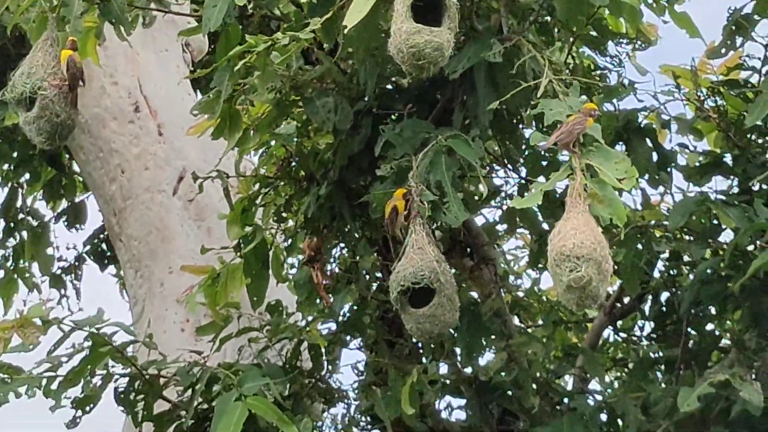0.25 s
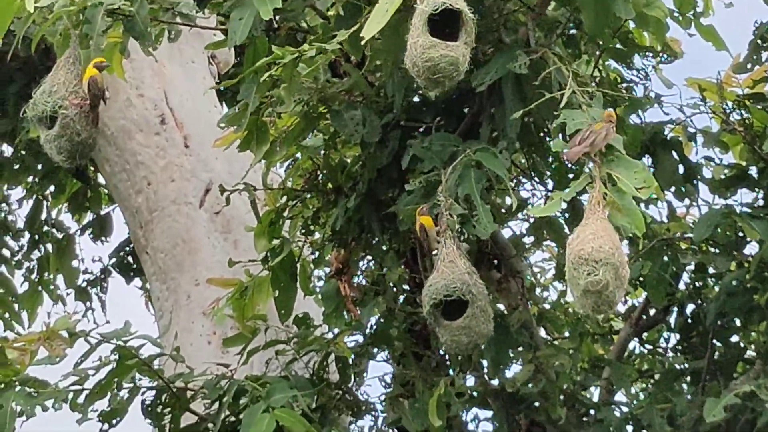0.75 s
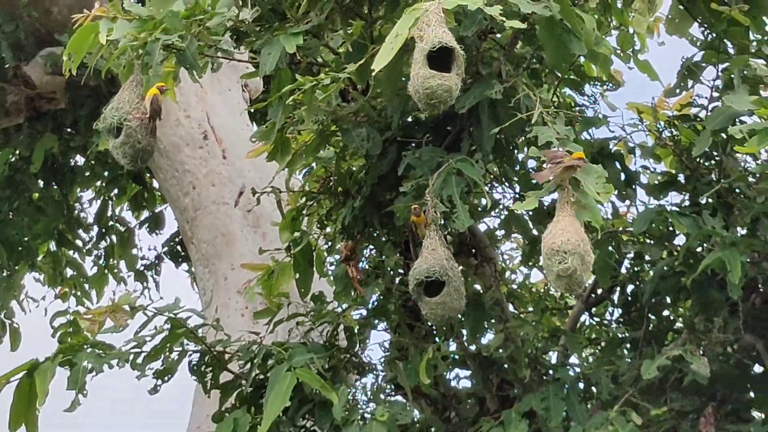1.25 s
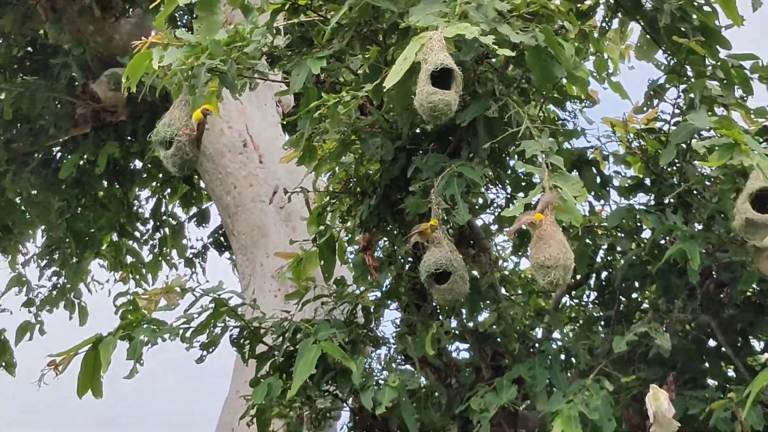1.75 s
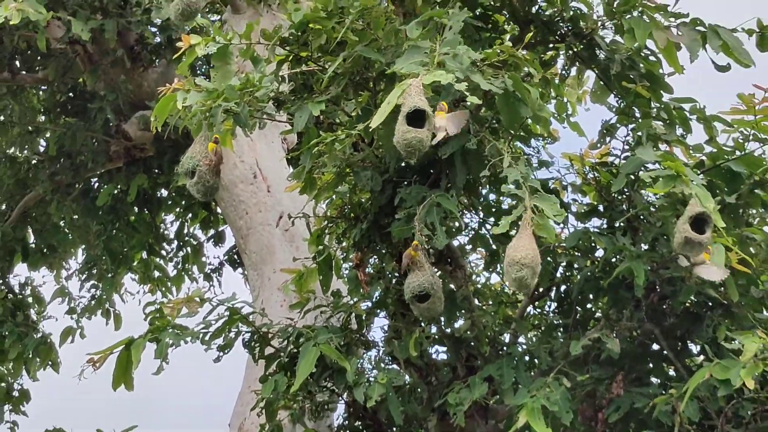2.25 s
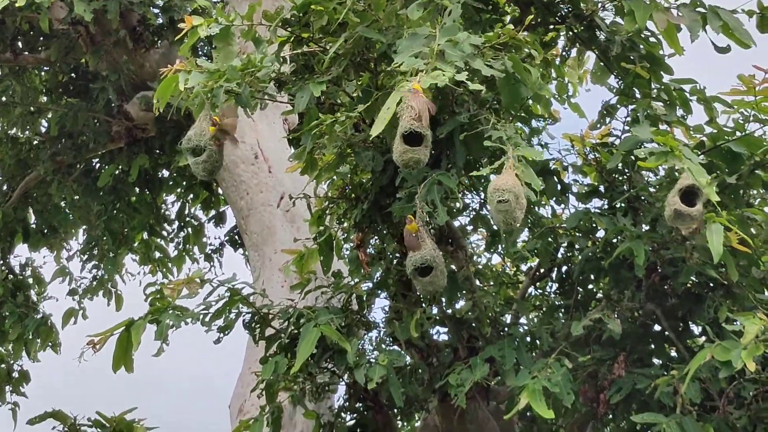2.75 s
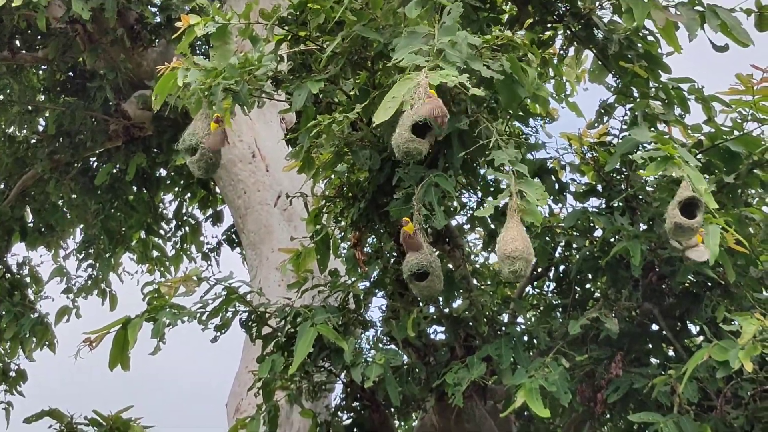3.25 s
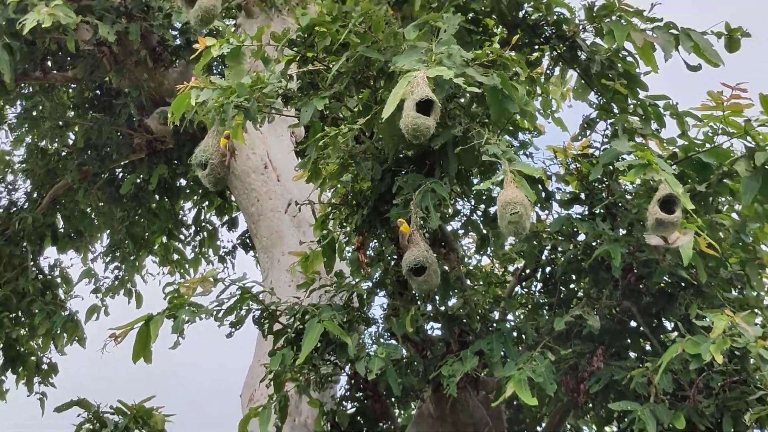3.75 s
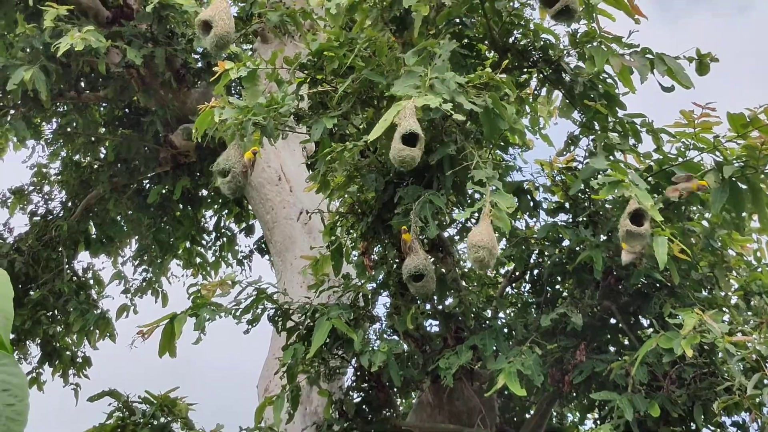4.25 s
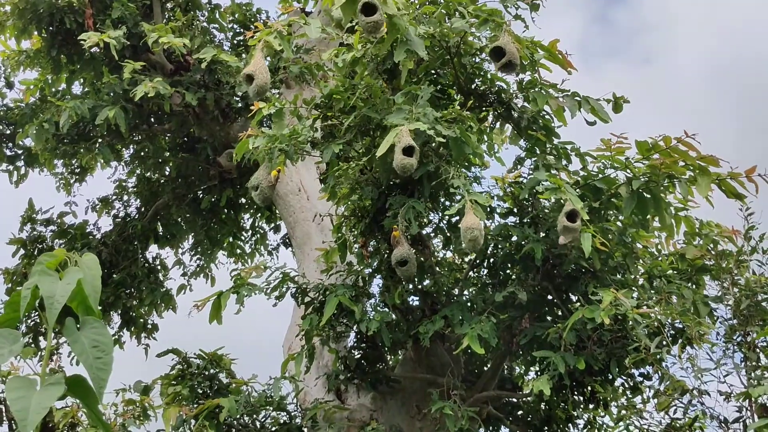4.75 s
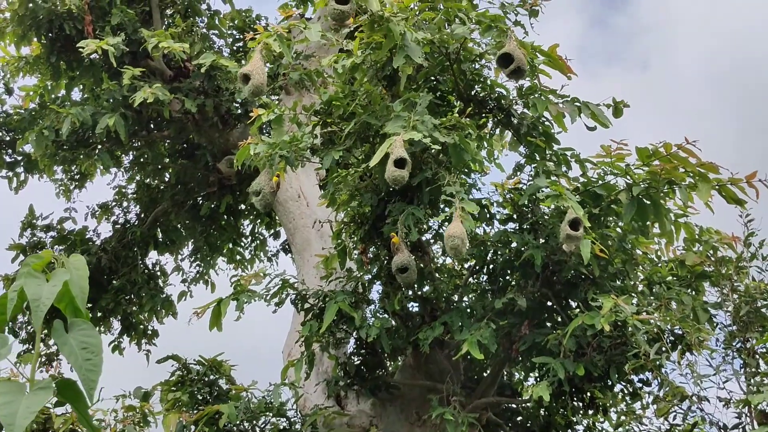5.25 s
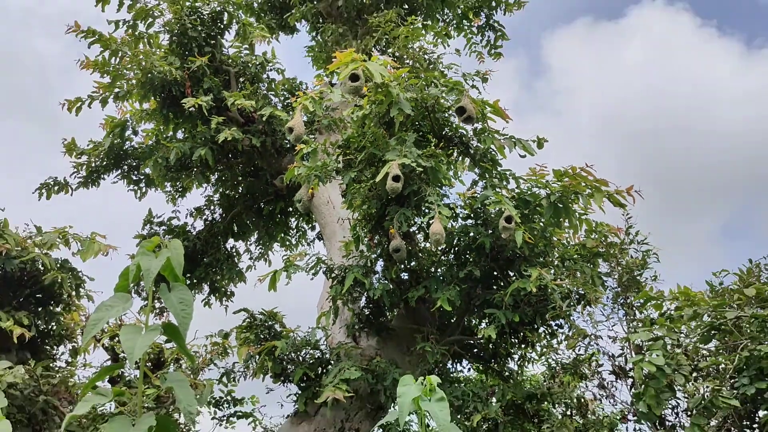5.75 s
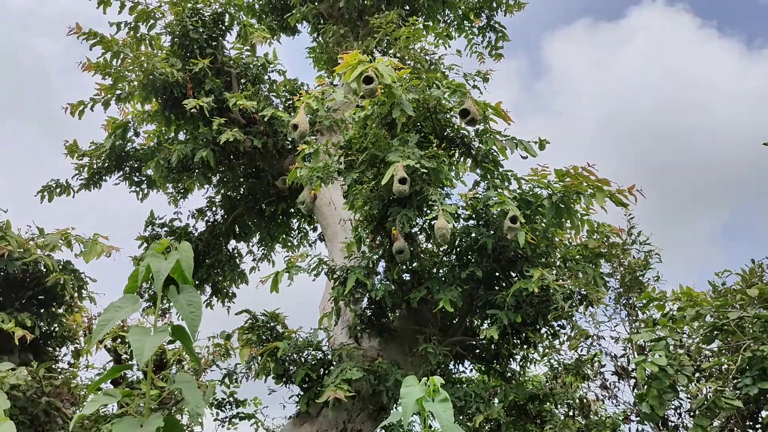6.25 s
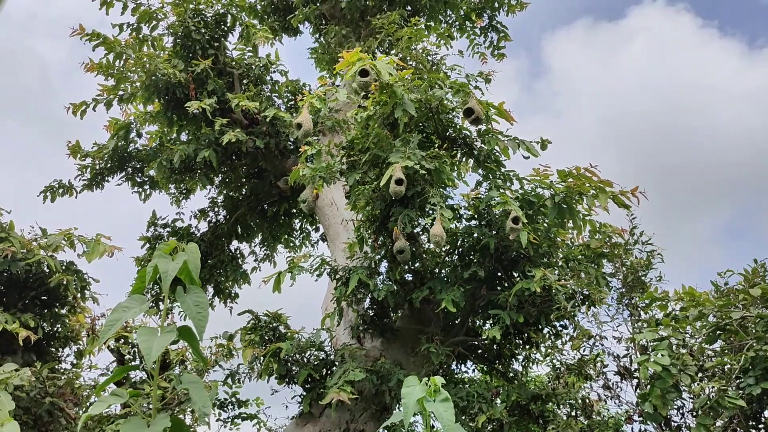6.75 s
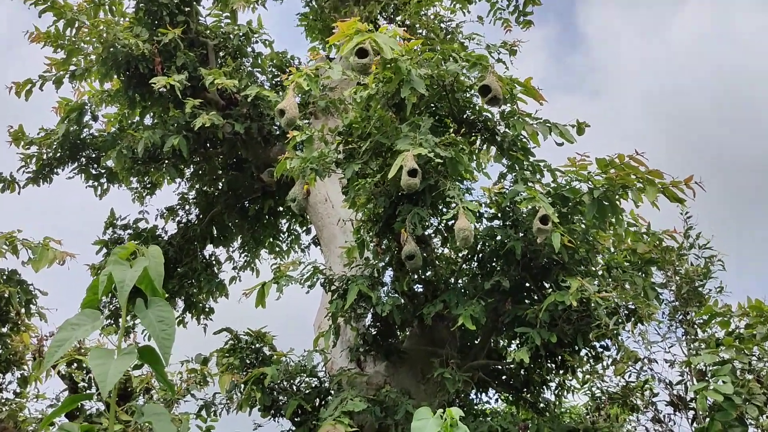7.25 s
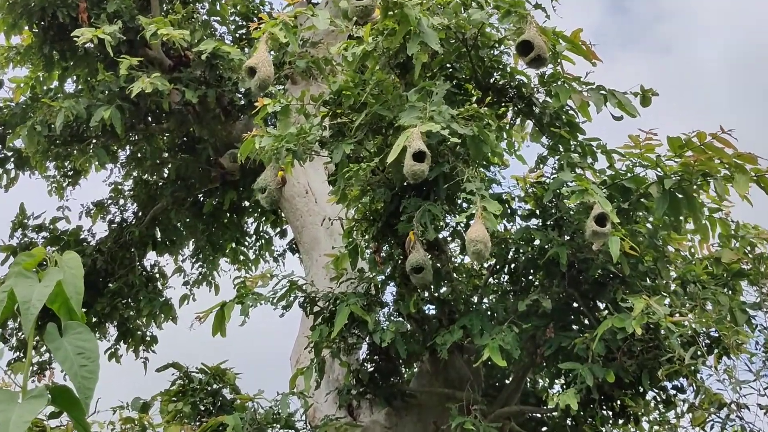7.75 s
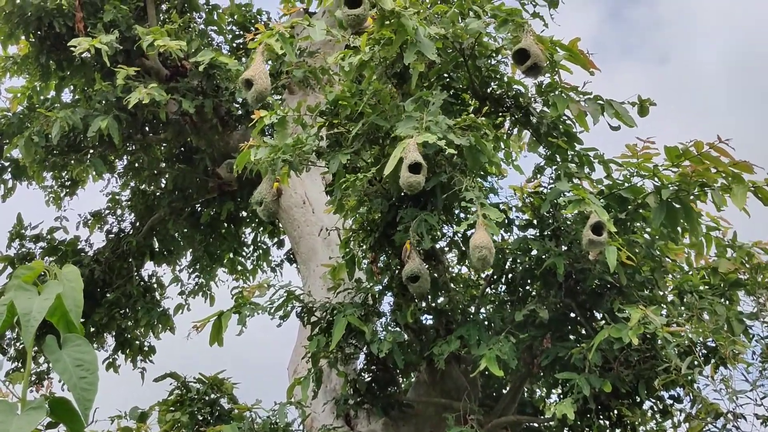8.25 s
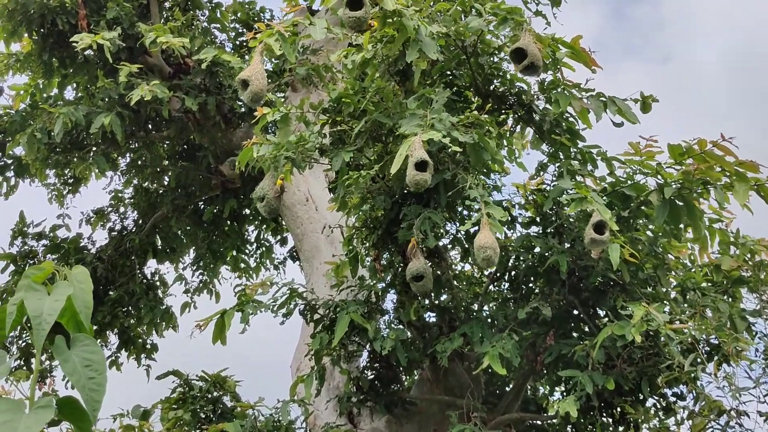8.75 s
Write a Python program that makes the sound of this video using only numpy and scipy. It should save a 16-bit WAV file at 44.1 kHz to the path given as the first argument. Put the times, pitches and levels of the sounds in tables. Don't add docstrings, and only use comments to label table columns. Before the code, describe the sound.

A colony of weaver birds chirps, whistles and chatters in a leafy tree, loudest in the first few seconds, with sharp double chirps continuing.

```python
import sys
import numpy as np
from scipy import signal
from scipy.fft import rfft, irfft, next_fast_len
from scipy.io import wavfile
from scipy.ndimage import uniform_filter1d

SR = 44100
rng = np.random.default_rng(int(sys.argv[2]) if len(sys.argv) > 2 else 0)


def ratio_of_db(decibels):
    return 10 ** (np.asarray(decibels, float) / 20)


def put_to_file(sound):
    columns = np.atleast_2d(sound).T
    safe = np.clip(columns, -1, 1)
    whole_steps = np.round(safe * 32767)
    wavfile.write(sys.argv[1], SR, whole_steps.astype(np.int16))


N = 397341

# (time [s], peak level [dB], top pitch [Hz],
# second stroke re first [dB], second stroke delay [s])
CHIRPS = [(0.0584, -39.5, 5996, 4, 0.033), (0.2065, -35.5, 6110, 1.5, 0.032), (0.484, -38, 6105, 0, 0.032),
          (0.7338, -44, 5960, 3.5, 0.035), (0.9097, -42, 6130, 2, 0.038), (1.097, -42.5, 6150, 3.5, 0.036),
          (1.231, -37, 6490, -5, 0.036), (3.417, -34.5, 6000, 0.5, 0.039), (3.618, -32.5, 6000, 0.5, .039),
          (4.006, -33, 5880, -1.5, 0.033), (5.2664, -41.5, 5870, -0.5, 0.034),
          (5.653, -36.5, 5940, -3, 0.031), (5.9525, -36.5, 5926, -1, 0.035),
          (6.2347, -34.5, 5980, -5, 0.037), (6.5382, -37, 5980, -1, 0.034), (6.7091, -35, 6020, -3, 0.035),
          (6.89, -35.5, 5940, -4, 0.036), (7.0986, -35, 6040, -1, 0.038), (7.3853, -36, 6020, -0.5, 0.036),
          (7.6712, -37, 5970, -1, 0.036), (7.9907, -35.5, 6040, 1, 0.033), (8.2457, -36, 5990, -0.5, 0.034),
          (8.459, -34.5, 6000, -3, 0.034), (8.6667, -34.5, 5965, -2, 0.037),
          (8.8207, -32.5, 6040, -7, 0.036), (9.0029, -39.5, 6060, -17.5, 0.043)]
# (time [s], level [dB])
CHITS = [(1.704, -44.5), (2.113, -44.5), (2.169, -45.5), (2.432, -47), (3.53, -48), (3.936, -41.5),
         (4.09, -43), (4.245, -40.5), (4.4, -45.5), (4.557, -45), (4.915, -48.5), (5.095, -52.5),
         (5.275, -55.5), (5.47, -56.5), (5.902, -56.5), (6.051, -55), (6.45, -62), (6.68, -57.5),
         (7.33, -62), (7.76, -65.5), (8.05, -59.5), (8.399, -54.5)]
# (frequency [Hz], level [dB per Hz])
COLOUR = [(760, -56.5), (1300, -28), (1780, -34), (2180, -29), (2600, -26), (3090, -16), (5990, 3),
          (7140, -4), (7640, 3.5), (8000, -11.5), (8500, -62), (17600, -120)]
# (left-right [dB], left port delay [samples])
PERCH = dict(chirp=(6, 4), slur=(0, 5), chit=(5, 1), pip=(5, 2), rasp=(3, 3), nasal=(-1, -9))


def rms_one(x):
    return x / np.sqrt(np.mean(x ** 2) + 1e-20)


def at_hz(points, hz):
    table_hz, table_db = np.transpose(points)
    return np.interp(np.log(hz + 1), np.log(table_hz), table_db)


def coloured(x, points):
    size = next_fast_len(N)
    gain = ratio_of_db(at_hz(points, np.fft.rfftfreq(size, 1 / SR)))
    return irfft(rfft(x, size) * gain, size)[..., :N]


def band(x, low_hz, high_hz):
    sos = signal.butter(3, [low_hz, high_hz], "band", fs=SR, output="sos")
    return rms_one(signal.sosfilt(sos, x))


def flutter(size, rate_hz):
    steps = np.arange(size) * rate_hz / SR
    count = int(steps[-1]) + 2
    targets = np.random.default_rng(rng.integers(1 << 30)).standard_normal(count)
    return np.interp(steps, np.arange(count), targets)


def swells(rows, rise):
    t = np.arange(0, N + 128, 128) / SR
    power = 0
    for s, db, fade_s in rows:
        falling = (t - s) / max(fade_s, .02)
        rising = (s - t) / max(rise * fade_s, .01)
        power = power + ratio_of_db(2 * db - 20 * np.maximum(falling, rising))
    return np.interp(np.arange(N) / SR, t, power)


def add(out, at_s, sound, perch):
    pan_db, lag = perch
    start = round(at_s * SR)
    for channel, i, gain in (out[0], start + lag, ratio_of_db(pan_db / 2)), (out[1], start, ratio_of_db(-pan_db / 2)):
        channel[i:i + len(sound)] += gain * sound[:max(N - i, 0)]


def whistle(voice, overtones_db, rough_db):
    s, hz, level_db = np.transpose(voice)
    t = np.arange(s[0], s[-1], 1 / SR)
    pitch_hz = np.interp(t, s, hz) * (1 + .012 * flutter(len(t), 60))
    phase = 2 * np.pi * np.cumsum(pitch_hz) / SR
    tone = np.sin(phase)
    for k, db in enumerate(overtones_db, 2):
        overtone_hz = k * pitch_hz
        tone += ratio_of_db(db + at_hz(COLOUR, overtone_hz)) * np.sin(k * phase) * (overtone_hz < 8200)
    rough = rough_db * np.minimum(flutter(len(t), 450), 1)
    return tone * ratio_of_db(np.interp(t, s, level_db) + rough)


def repeated(events, voices, overtones_db, rough_db, gain_db, perch):
    out = np.zeros((2, N))
    for s, db in events:
        for voice in voices:
            sung = whistle(voice, overtones_db, rough_db)
            add(out, s + voice[0][0], ratio_of_db(db + gain_db) * sung, perch)
    return out


def leaves(x, t60_s, wet_db):
    t = np.arange(round(.35 * SR)) / SR
    scatter = rng.standard_normal((2, len(t))) * ratio_of_db(-60 * t / t60_s) * np.minimum(t / 0.0051, 1)
    scatter = scatter / np.sqrt(np.sum(scatter ** 2, axis=1, keepdims=True))
    wet = signal.fftconvolve(x[:1], scatter, axes=1)[:, :N]
    return x + ratio_of_db(wet_db) * ratio_of_db([[0], [-3.5]]) * wet


def wind():
    # (frequency [Hz], level [dB per Hz])
    air = [(15, -55), (25, -21.5), (43, -12.5), (117, -3), (228, -18.5), (362, -25), (743, -42), (900, -30),
           (1300, -56)]
    # (time [s], level [dB], fade by 10 dB [s])
    gusts = [(.03, -69, 0.04), (.5, -76.5, .5), (1.57, -71.5, 0.12), (2.03, -66.5, 0.22), (2.5, -71, -0.46),
             (3.1, -82.5, 1.2), (3.46, -65, -0.08), (3.77, -74, 0.3), (4.39, -67, -0.5), (5.44, -82, 0),
             (6.53, -84, 1)]
    # (time [s], level [dB], fade by 10 dB [s])
    flights = [(1.64, -80, 0), (1.7, -91.5, 0.5), (2.155, -79.5, 0.05), (2.76, -77, 0.2),
               (3.12, -75, -0.06), (3.46, -80.5, 0.2), (3.22, -72, 0.01), (3.72, -80, 0.07),
               (3.93, -78, 0.12), (4.27, -92.5, 0.1)]
    breeze_db, stir_db = -82.5, -105
    gust = np.sqrt(ratio_of_db(2 * breeze_db) + swells(gusts, rise=0.88))
    flight = np.sqrt(ratio_of_db(2 * stir_db) + swells(flights, rise=0.58))
    noise = coloured(rng.standard_normal((2, N)) + 1.3 * rng.standard_normal(N), air)
    rumble = gust * ratio_of_db(1.7 * flutter(N, 13.0)) * band(noise, 24, 270)
    feathers = [(150, -42.5), (260, -7.0), (380, -4.5), (500, -14.5), (800, -7.5), (1100, -29.0)]
    wings = rms_one(coloured(rng.standard_normal((2, N)), feathers))
    wings = flight * ratio_of_db(4.5 * flutter(N, 29)) * wings * ratio_of_db([[2.5], [-2.5]])
    return rumble + wings + ratio_of_db(-93) * band(noise, 500, 1500)


def buffets():
    # (time [s], peak level [dB], centre frequency [Hz])
    thumps = [(1.615, -55.5, 158.4), (1.888, -63.5, 131), (1.946, -63, 146), (2.074, -62, 129),
              (2.145, -63, 177), (2.45, -69.5, 118), (2.704, -61, 168), (2.789, -66.5, 109),
              (3.062, -69, 186), (3.237, -70, 119), (3.451, -58.5, 109.7), (3.751, -60, 116),
              (4.188, -73, 121), (4.325, -69, 118)]
    gain_db, front_db, fade_s, front_fade_s = -3, -13.5, .03, .013
    out, t = np.zeros((2, N)), np.arange(0, .15, 1 / SR)
    for s, db, hz in thumps:
        phase = 2 * np.pi * np.cumsum(hz * (1 + .25 * flutter(len(t), 60))) / SR
        puff = np.sin(phase) * ratio_of_db(3 * flutter(len(t), 50)) * np.exp(-t / fade_s)
        front = band(rng.standard_normal(len(t)), 220, 550) * np.exp(-t / front_fade_s)
        thump = (puff + ratio_of_db(front_db) * front) * np.minimum(t / .008, 1)
        add(out, s, ratio_of_db(db + gain_db) * thump, (3, 0))
    return out


def dove():
    # (time [s], length [s], level [dB])
    murmurs = [
        (0.0, 0.51, -79.5),
        (2.395, 0.21, -84.5),
        (2.689, 0.21, -77.5),
        (3.757, 0.4, -87),
        (5.36, 0.25, -85),
        (7.72, 0.4, -83),
    ]
    t = np.arange(N) / SR
    held = 0
    for s, length_s, db in murmurs:
        held = held + ratio_of_db(db) * np.sin(np.pi * np.clip((t - s) / length_s, 0, 1)) ** 0.41
    breath = band(rng.standard_normal((2, N)) + rng.standard_normal(N), 290, 406)
    return held * ratio_of_db(2.9 * flutter(N, 13)) * breath * ratio_of_db([[2.5], [-2.5]])


def nasal():
    # (time [s], length [s], top pitch [Hz], level [dB], overtones [dB])
    calls = [(0.088, 0.12, 1090, -82, -1), (0.387, 0.09, 1020, -82, -4), (0.539, 0.12, 1030, -77, -13),
             (1.948, 0.19, 1216, -74.5, -23), (2.32, 0.34, 1172, -73.5, -5),
             (2.905, 0.22, 1125, -72.5, -25), (3.204, 0.19, 1108, -73.5, -21), (3.607, 0.17, 1113, -71, 6),
             (4.108, 0.29, 1168, -74.5, -5.5), (4.605, 0.19, 1100, -86.5, -10),
             (4.948, 0.19, 1096, -81.5, 22), (5.33, 0.29, 1102, -79, 16.5), (5.723, 0.26, 1018, -77, 1.5),
             (6.1, 0.28, 1019, -75, 9), (6.597, 0.16, 1034, -75.5, 12), (6.91, 0.24, 1027, -77.5, 12.5),
             (7.386, 0.2, 1066, -77, 15), (7.701, 0.34, 1080, -87, 22.5), (7.931, 0.15, 1040, -81, -4),
             (8.307, 0.19, 1033, -74.5, -2), (8.72, 0.25, 1031, -74, 8)]
    # (multiple of the pitch [1], level [dB])
    overtones = [(2, 0), (3, -20), (4, -8), (5, 1), (6, 6), (7, -14)]
    rise, sag, top_at = .025, .085, .3
    out = np.zeros((2, N))
    for start_s, length_s, top_hz, db, bright_db in calls:
        part = np.linspace(0, 1, round(length_s * SR))
        size = len(part)
        arch = np.interp(part, [0, top_at, 1], [-np.sqrt(rise), 0, sag ** .25])
        arch = np.where(arch < 0, arch ** 2, arch ** 4)
        pitch_hz = top_hz * (1 - arch) * (1 + .006 * flutter(size, 40) + .009 * flutter(size, 160))
        phase = 2 * np.pi * np.cumsum(pitch_hz) / SR
        hoarse_db = 3 * flutter(size, 120)
        upper = 0
        for k, level_db in overtones:
            upper = upper + ratio_of_db(level_db + bright_db * (k > 2) + hoarse_db) * np.sin(k * phase)
        low_db = -5 + 3 * (part - .6) + 4.5 * flutter(size, 25) + 5 * flutter(size, 130)
        call = ratio_of_db(low_db) * np.sin(phase) + upper * (1 - part ** 3)
        add(out, start_s, ratio_of_db(db + 5) * call * np.sin(np.pi * part) ** .4, PERCH["nasal"])
    return out


def crowd(count):
    out = np.zeros((2, N))
    for bird in range(count):
        draw = rng.random((900, 4))
        onsets_s = np.cumsum(0.013 + .03 * draw[:, 0] ** 2) - .1
        clock = np.interp(np.arange(N) / SR, onsets_s, np.arange(900))
        note, part = clock.astype(int), clock % 1
        pitch_hz = 2100 * 1.9 ** draw[note, 1] * (1 - (.08 + .3 * draw[note, 2]) * part)
        pitch_hz *= 1 + .024 * flutter(N, 300)
        phase = 2 * np.pi * np.cumsum(pitch_hz) / SR
        tone = np.sin(phase) + 1.07 * np.sin(2 * phase) + 1.13 * np.sin(3 * phase)
        swell = np.sin(np.pi * part ** 0.55) ** 2 * ratio_of_db(7.7 * draw[note, 3] + 3.2 * flutter(N, 500))
        add(out, 0, tone * swell, (4 + 4 * rng.standard_normal(), bird % 7))
    return rms_one(out)


def chatter():
    # (time [s], level [dB])
    excitement = [(0, -60.5), (.88, -67), (1.21, -57), (1.44, -37.5), (1.68, -49.5), (2.0, -38.5),
                  (2.09, -46), (2.46, -39.5), (2.78, -33), (3.38, -35.5), (3.5, -38), (3.84, -35.5),
                  (4.2, -42), (4.44, -42), (4.52, -63.5), (5.2, -59.5), (5.61, -64), (9.0, -60)]
    # (time [s], level [dB], low voices re level [dB], fade by 10 dB [s])
    outbursts = [(0.097, -41, -12.5, 0.1), (.24, -41.5, -18.5, 0.02), (0.521, -50, -8, 0.09),
                 (0.788, -45, -7.5, 0.08), (0.942, -43, -9, 0.07), (1.136, -39, -11, 0.13),
                 (1.268, -41.5, -24.5, -1.15), (1.54, -35.5, -15, 0.14), (1.794, -39.5, -5, 0.26),
                 (1.92, -37, -18, -0.64), (1.998, -43, 3, 0.52), (2.317, -37.5, -6.5, 0.26),
                 (4.38, -43.5, -3, 0), (4.63, -39.5, -11, 0.1043), (4.78, -42, -3, 0.1569),
                 (4.97, -48, -12.5, 0.05), (5.309, -47.5, -3.5, 0.12), (5.531, -54, -7, 0.5),
                 (5.702, -50, -3.5, 0.13), (5.99, -50, 0, 0.01), (6.26, -52.5, -3, 0.25),
                 (6.58, -46, -8.5, 0.09), (6.74, -55.5, -16, 0.74), (6.929, -52.5, -2, 0.3),
                 (7.439, -50, -12.5, 0.24), (7.74, -53, -5, 0.2), (8.291, -48.5, -10, 0.3),
                 (8.479, -54.5, 0, 0.13), (8.85, -49, -5.5, 0.42)]
    # (time [s], depth [dB], half length [s])
    lulls = [(1.33, -5, 0.023), (1.424, -5, 0.03), (1.678, -6, 0.024), (1.913, -5.5, 0.031),
             (2.091, -5, 0.021), (2.462, -6, 0.039), (3.502, -5, .03), (3.99, -3.5, 0.023),
             (4.203, 0, 0.023), (5.054, -2.5, 0.028), (5.624, -6, 0.036), (6.863, -4.5, .04),
             (7.049, -7.5, 0.056), (7.637, -4.5, 0.026), (8.123, -3.5, .04)]
    steady_db = np.interp(np.arange(N) / SR, *np.transpose(excitement))
    high_bursts = swells([(s, db, fade_s) for s, db, _, fade_s in outbursts], rise=0.57)
    high = np.sqrt(ratio_of_db(2 * steady_db) + high_bursts)

    low_steady_db = -52.5 + 1.174 * (steady_db + 43.5)
    low_bursts = swells([(s, db + low_db, fade_s) for s, db, low_db, fade_s in outbursts], rise=0.81)
    trail = swells([(s + 0.057, -55 + 0.58 * (db + 58.0), 0.046) for s, db in CHITS], rise=0.95)
    low = np.sqrt(ratio_of_db(2 * low_steady_db) + low_bursts + trail)
    lowest = ratio_of_db(-29) * low * np.minimum(low / ratio_of_db(-48), 1) ** .7

    blur_db = -4 + np.clip(-10 * np.log10(high) - 21, 0, 7)
    blur = rng.standard_normal((2, N)) * ratio_of_db(blur_db + np.array([[2], [-2]]))
    many = leaves(crowd(count=6), t60_s=.14, wet_db=0.0) + blur
    many = coloured(many, [(700, -75)] + COLOUR)

    t = np.arange(0, N, 64) / SR
    lull_db = sum(db * np.exp(-((t - s) / half_s) ** 2) for s, db, half_s in lulls)
    lull = np.interp(np.arange(N) / SR, t, ratio_of_db(lull_db))
    voices = high * band(many, 4300, 9000) + low * band(many, 1700, 4300)
    return lull * (voices + lowest * band(many, 960, 1700))


def rasps(events, length_s, perch):
    out, t = np.zeros((2, N)), np.arange(0, length_s, 1 / SR)
    shape = np.sin(np.pi * (t / t[-1]) ** .45) ** .8
    for s, db in events:
        cycle = np.cumsum(185 * (1 + 0.28 * flutter(len(t), 210)) / SR) % 1
        clicks = np.exp(-cycle / 0.47) * rng.standard_normal(len(t))
        add(out, s - .005, ratio_of_db(db) * clicks * shape, perch)
    return out


def harsh_voices():
    # (time [s], level [dB])
    harsh_calls = [(.395, -64), (0.574, -51.5), (.675, -51), (0.786, -51), (0.905, -47), (1.0, -48.5),
                   (1.121, -48), (1.23, -49), (1.354, -44.5), (1.46, -50.5)]
    second_strokes = [(s + delay_s, db) for s, db, _, _, delay_s in CHIRPS]
    harsh = ratio_of_db(1.5) * rasps(CHITS, .1, PERCH["rasp"])
    harsh += ratio_of_db(12.5) * rasps(harsh_calls, .075, PERCH["rasp"])
    harsh += ratio_of_db(-14.5) * rasps(second_strokes, .06, PERCH["chirp"])
    return coloured(harsh, [(800, -68.0)] + [(hz, .5 * db) for hz, db in COLOUR])


def pips(gain_db):
    # (time [s], level [dB], start pitch [Hz], length [s])
    short_notes = [(1.492, -27.5, 6060, 0.013), (1.903, -37.5, 6040, 0.01), (2.334, -36.5, 4730, 0.015),
                   (2.332, -34.5, 6100, 0.01), (2.612, -36, 6590, 0.022), (2.653, -36.5, 4750, 0.022),
                   (2.752, -28.5, 5130, 0.0067), (2.796, -28, 6100, 0.019), (2.938, -31, 6310, 0.013),
                   (3.268, -33.5, 4920, 0.016), (3.321, -32, 5620, 0.014), (3.543, -35.5, 4830, 0.015),
                   (3.759, -36.5, 4950, 0.015), (3.66, -34, 4880, .014), (3.869, -33, 5790, .014),
                   (1.704, -41, 6300, .012), (2.903, -35.5, 5570, 0.0088), (3.297, -34.5, 5390, 0.01),
                   (4.46, -45, 4510, .02), (3.832, -36.5, 5910, 0.018), (3.914, -32, 5000, 0.013),
                   (4.738, -31.5, 5975, 0.016)]
    # (time [s], level [dB], start pitch [Hz], end pitch [Hz], length [s])
    sweeps = [(.352, -64, 5400, 3000, .09), (1.675, -52, 4600, 4400, 0.036), (1.85, -46, 4250, 4100, 0.035),
              (1.9, -43.5, 4800, 3900, 0.049), (1.74, -58, 3700, 4700, 0.09), (4.6, -49.5, 6340, 5990, .06),
              (3.299, -40.5, 5980, 4500, 0.055), (6.095, -57.5, 2150, 2500, 0.027),
              (6.115, -59.5, 2640, 2100, 0.025), (6.13, -72.5, 2100, 1550, 0.04),
              (8.455, -61.5, 2150, 1980, 0.04), (4.79, -56.5, 3300, 2600, .09),
              (4.77, -41, 6700, 5900, .05), (4.34, -49.5, 4300, 3700, .05),
              (4.66, -48.5, 4500, 3870, 0.046)]
    fall = .06
    notes = [(s, db, hz, hz * (1 - fall), length_s) for s, db, hz, length_s in short_notes]
    part = np.array([0, .2, .5, .8, 1])
    level_db = [-29.0, 2.0, -6.5, -3.0, -33.5]
    out = np.zeros((2, N))
    for s, db, start_hz, end_hz, length_s in notes + list(sweeps):
        glide_hz = end_hz + (start_hz - end_hz) * (1 - part) ** 1.4
        voice = np.transpose([part * length_s, glide_hz, level_db])
        add(out, s, ratio_of_db(db + gain_db) * whistle(voice, [-20], 3), PERCH["pip"])
    return out


def hook():
    # (time [s], level [dB])
    hook_at = [
        (1.29, -35),
    ]
    # (time from onset [s], pitch [Hz], level [dB])
    hook_voices = [
        [(0, 5880, -22), (.01, 5890, -0.5), (.027, 5740, 3.5), (.04, 4600, -13), (.055, 4060, -11.5),
         (.066, 4000, -23)],
        [(.062, 4260, -20.5), (.068, 5500, -1), (.075, 5780, -4), (.1, 5540, -11.5), (.13, 5200, -26)],
    ]
    return repeated(hook_at, hook_voices, [-20], 2.7, 0, PERCH["pip"])


def chits():
    # (time from onset [s], pitch [Hz], level [dB])
    chit_voices = [
        [(-.005, 3391, -39), (-.001, 3560, 0), (.005, 2990, 5), (.012, 2193, -4), (.022, 1775, -6.5),
         (.034, 1713, -39.5)],
        [(.02, 3704, -36), (.026, 3357, -19.5), (.038, 2014, -12), (.058, 1665, -22.5)],
    ]
    near = [c for c in CHITS if c[1] > -56.5]
    far = [c for c in CHITS if c[1] <= -56.5]
    out = repeated(near, chit_voices, [17, 21], 2, -15, PERCH["chit"])
    return out + repeated(far, chit_voices, [10, 4], 2, -11, PERCH["chit"])


def slurs():
    # (time [s], level [dB])
    slur_events = [(1.476, -28.5), (1.882, -30.5), (2.275, -32.5), (2.676, -31.5), (3.064, -30),
                   (3.36, -36.5), (3.785, -33.5), (4.276, -30), (4.681, -35)]
    # (time from onset [s], pitch [Hz], level [dB])
    slur_voices = [
        [(-.008, 7880, -22.5), (0, 7395, -11), (.03, 6940, 0), (.04, 6300, 0.5), (.052, 5470, -11),
         (.056, 5300, -36)],
        [(.056, 5770, -36), (.06, 6100, 13), (.066, 6130, -25.5), (.072, 5230, 5.5), (.077, 4880, -37.5)],
        [(.005, 6800, -14), (.02, 6690, -3), (.038, 5710, 1), (.044, 5820, -32)],
        [(.074, 7890, -14.5), (.088, 7180, -9.5), (.112, 6410, -8.5), (.13, 6130, -29)],
        [(.082, 6800, -27.5), (.1, 6286, -7.5), (.125, 5704, -13.5), (.135, 5890, -2.5)],
        [(.028, 5877, -11.5), (.04, 4900, -10), (.055, 4184, -15), (.09, 3417, -17.5), (.125, 2767, -21.5),
         (.14, 2650, -34.5)],
        [(.11, 5400, -26), (.135, 4350, -16.5), (.165, 3490, -23), (.2, 2850, -32.5)],
    ]
    return repeated(slur_events, slur_voices, [], 2.5, 0, PERCH["slur"])


def chirps(gain_db):
    # (time from stroke [s], pitch [Hz], level [dB])
    first = [
        [(-.004, 5290, -24), (0, 5630, -2), (.006, 5980, 3.5), (.011, 5600, -8), (.014, 4900, -9),
         (.019, 3990, -14), (.032, 3460, -23.5)],
        [(-.007, 5400, -30.5), (-.003, 5880, 3), (.003, 6820, -5), (.009, 6950, -13), (.014, 6400, -37.5)],
    ]
    second = [
        [(-.003, 5400, -28.5), (0, 5790, -0.5), (.004, 6360, 5.5), (.009, 5680, 2), (.014, 5200, -23)],
        [(.008, 5450, -28), (.014, 6050, -15), (.025, 6440, -23), (.045, 6100, -36)],
        [(.01, 5230, -24.5), (.016, 4620, -16.5), (.024, 4000, -22), (.036, 3500, -30)],
    ]
    out = np.zeros((2, N))
    for s, db, top_hz, again_db, delay_s in CHIRPS:
        for at_s, level_db, voices in (s, db, first), (s + delay_s, db + again_db, second):
            for voice in voices:
                sung = whistle(np.array(voice) * [1, top_hz / 6000, 1], [-6], 3.6)
                vary_db = 2.5 * rng.standard_normal() * (voice is not voices[0])
                add(out, at_s + voice[0][0], ratio_of_db(level_db + gain_db + vary_db) * sung, PERCH["chirp"])
    return out


def scene():
    near = harsh_voices() + pips(gain_db=4.0) + hook() + chits() + slurs() + chirps(gain_db=2.5)
    near = signal.sosfilt(signal.butter(4, 1150, "high", fs=SR, output="sos"), near)
    near = leaves(near + nasal(), t60_s=0.095, wet_db=-2)
    return wind() + buffets() + dove() + chatter() + near


def hush(x):
    # (frequency [Hz], share of the cut [1])
    reach = [(500, .15), (1100, .9), (2600, .9), (3400, .2), (5500, .15), (7000, .12), (8200, .5)]
    # (frequency [Hz], left-right [dB])
    port_tilt = [(6500, 0), (7300, -3.5), (8000, -3)]
    slope, knee_db, most_db = 2.4, -3.5, 18
    hz, _, cells = signal.stft(x, SR, nperseg=1024, noverlap=640)
    hz, cells = hz[:220], cells[:, :220]
    power = np.sum(abs(cells) ** 2, axis=0)
    power = uniform_filter1d(uniform_filter1d(power, size=3, axis=0), size=7, axis=1)
    around = uniform_filter1d(uniform_filter1d(power, size=15, axis=0), size=15, axis=1)
    near_db = 10 * np.log10(abs(power) + 1e-20)
    around_db = 10 * np.log10(abs(around) + 1e-20)
    cut_db = np.clip(slope * (near_db - around_db - knee_db), -most_db, 0)
    cells = cells * ratio_of_db(cut_db * np.clip(at_hz(reach, hz), 0, 2)[:, None])
    cells = cells * ratio_of_db(np.outer([.5, -.5], at_hz(port_tilt, hz)))[:, :, None]
    cells = np.pad(cells, ((0, 0), (0, 293), (0, 0)))
    return signal.istft(cells, SR, nperseg=1024, noverlap=640)[1][:, :N]


def top_cut(x):
    return signal.sosfilt(signal.butter(12, 8630, fs=SR, output="sos"), x)


def record(dry):
    low_pass = signal.cheby2(14, 70, 8242 + 450, fs=SR, output="sos")
    mix = hush(signal.sosfilt(low_pass, dry))
    return top_cut(mix)


dry = scene()
out = record(dry)
put_to_file(out)
```